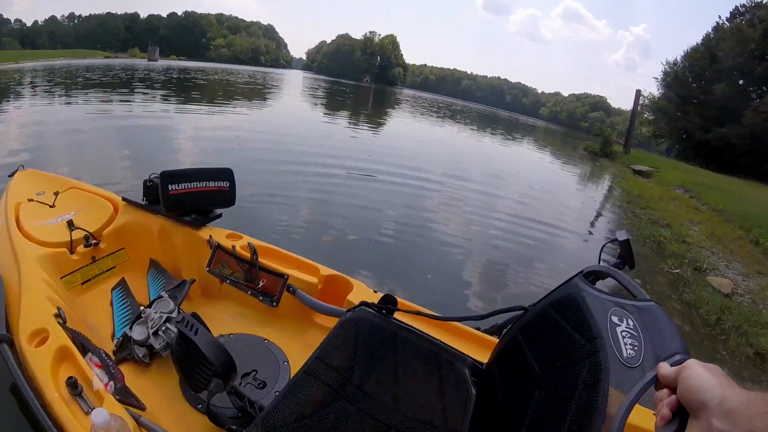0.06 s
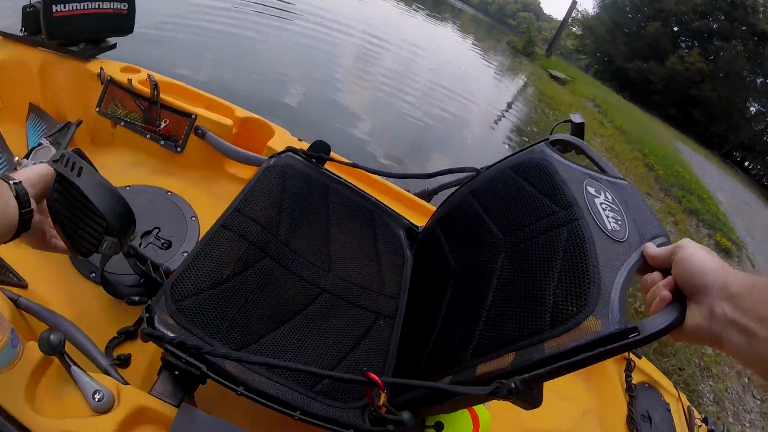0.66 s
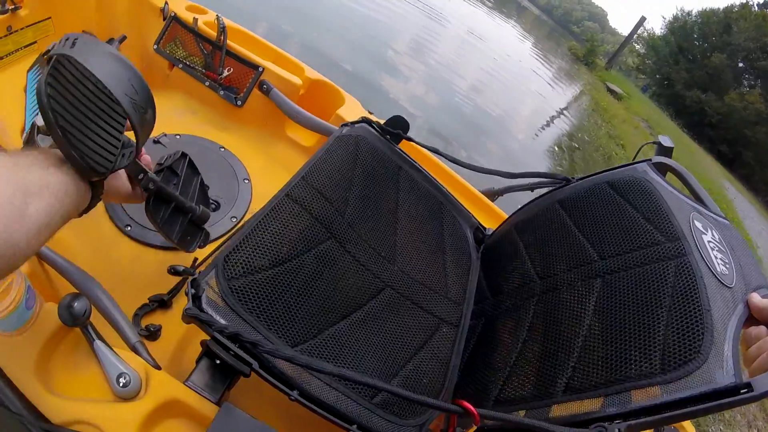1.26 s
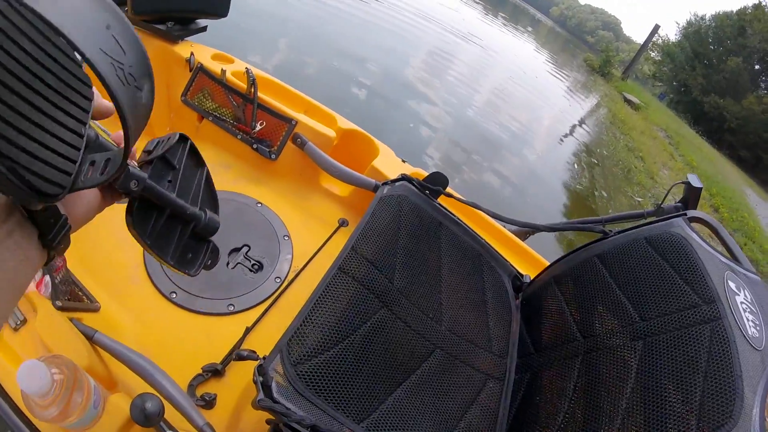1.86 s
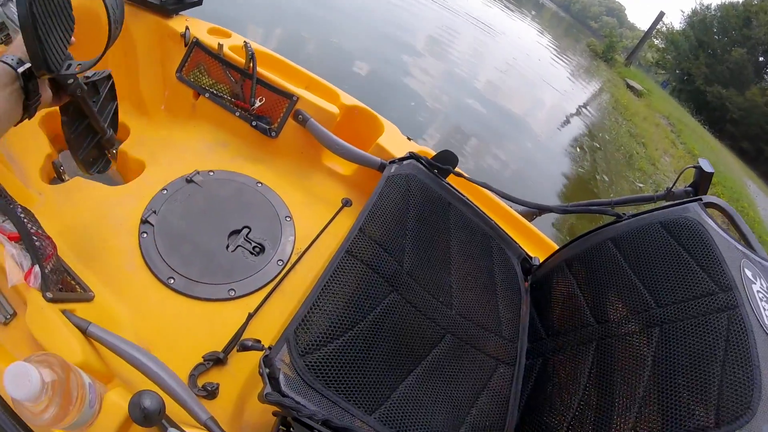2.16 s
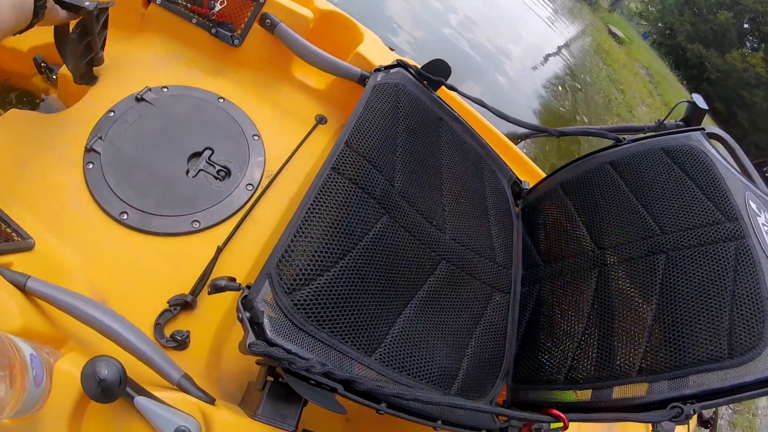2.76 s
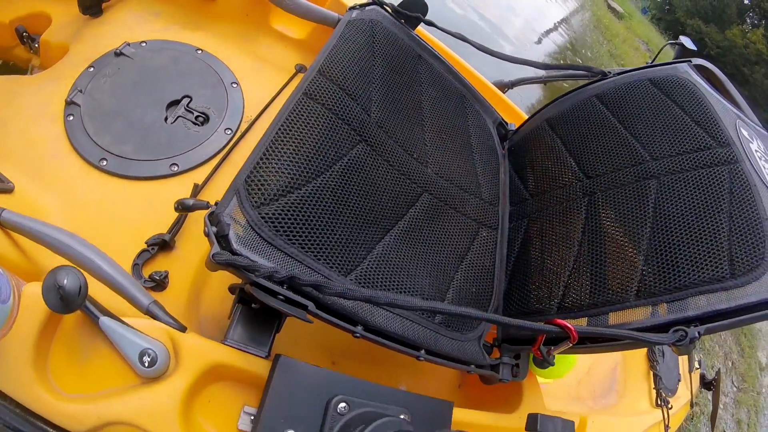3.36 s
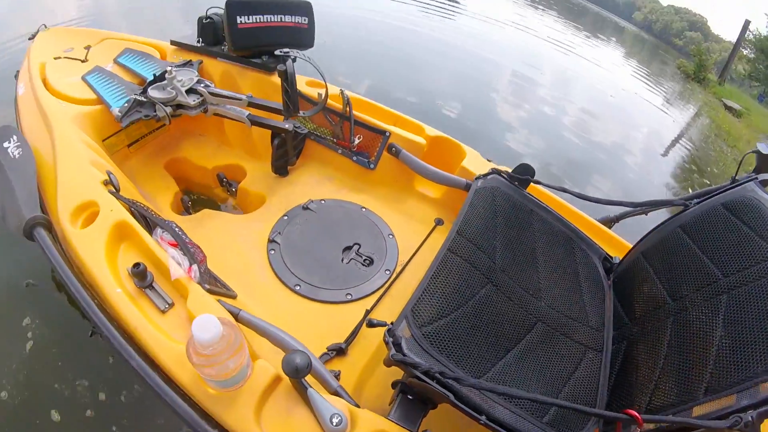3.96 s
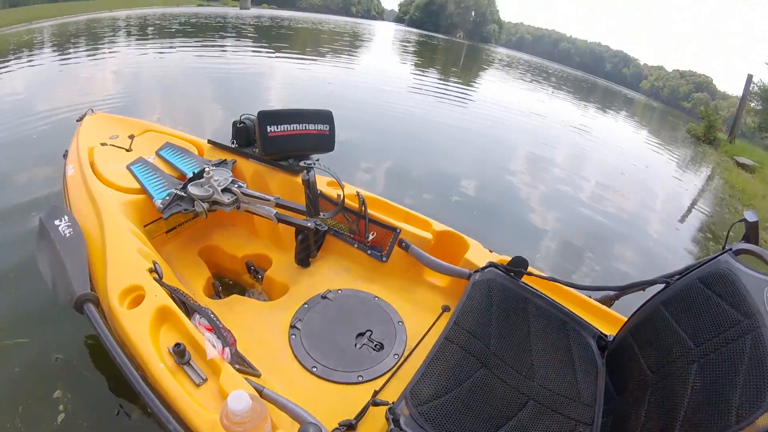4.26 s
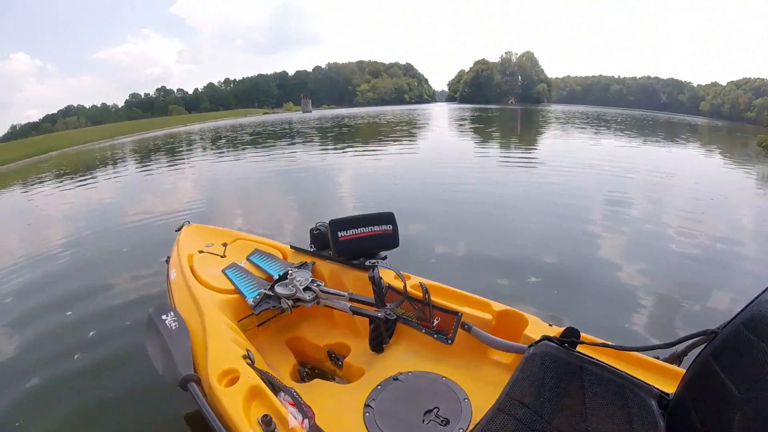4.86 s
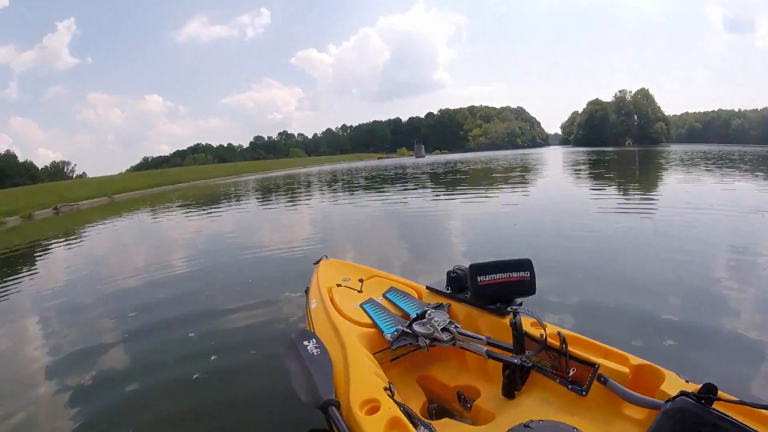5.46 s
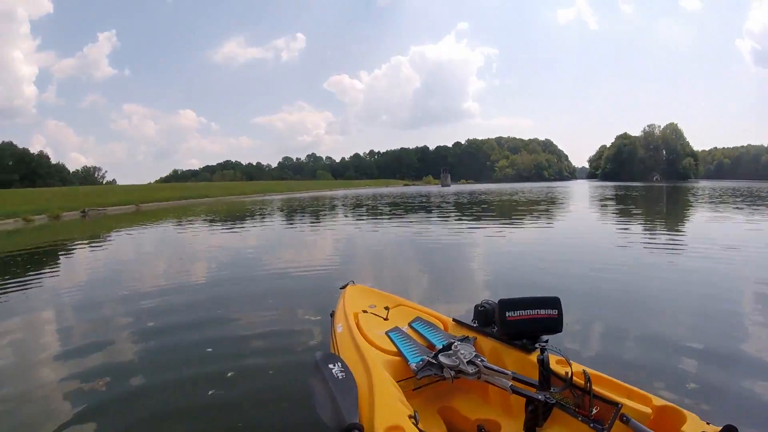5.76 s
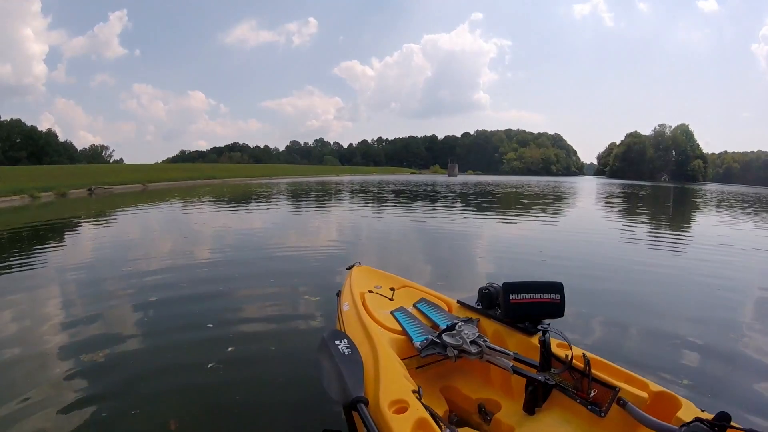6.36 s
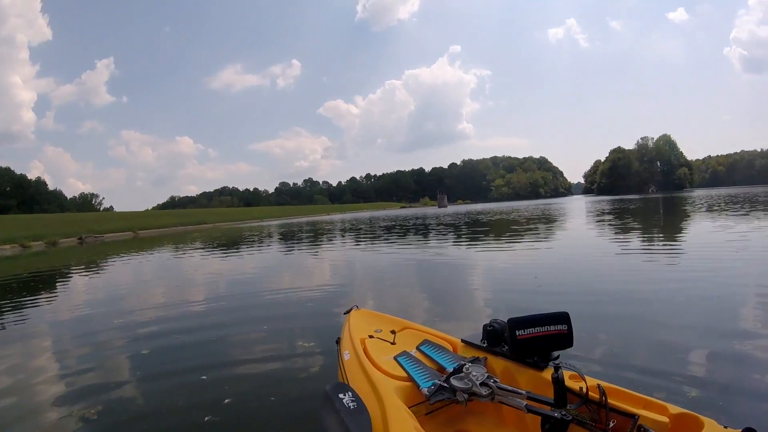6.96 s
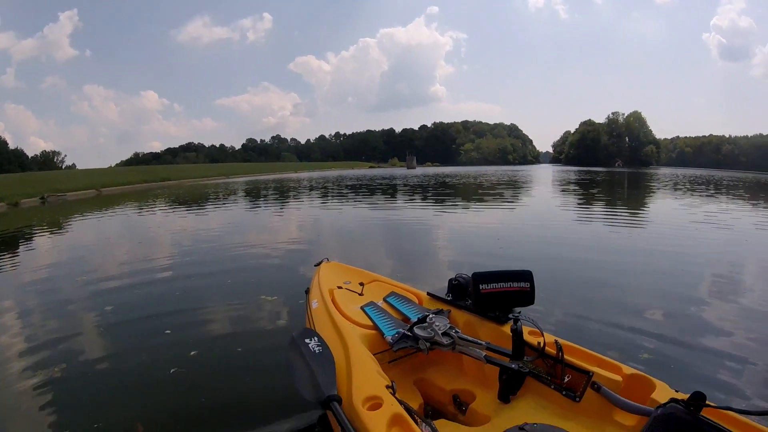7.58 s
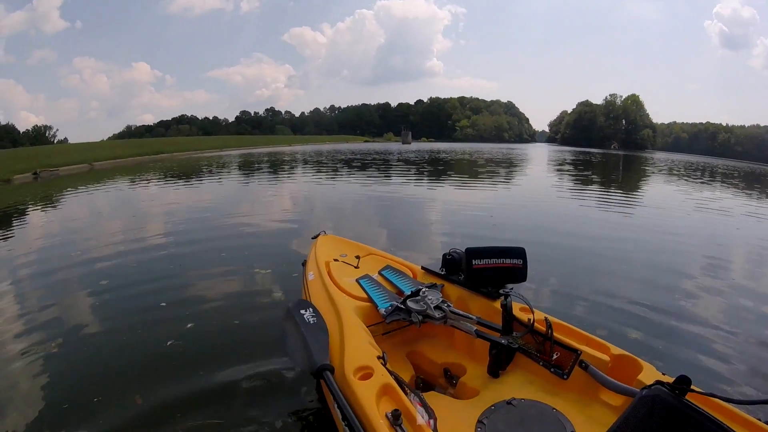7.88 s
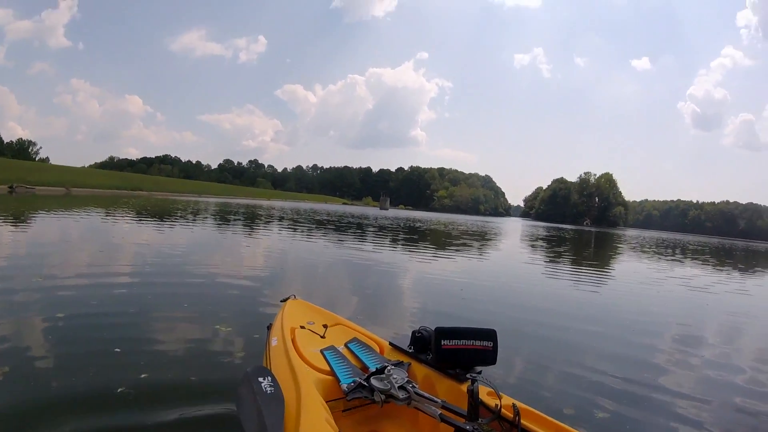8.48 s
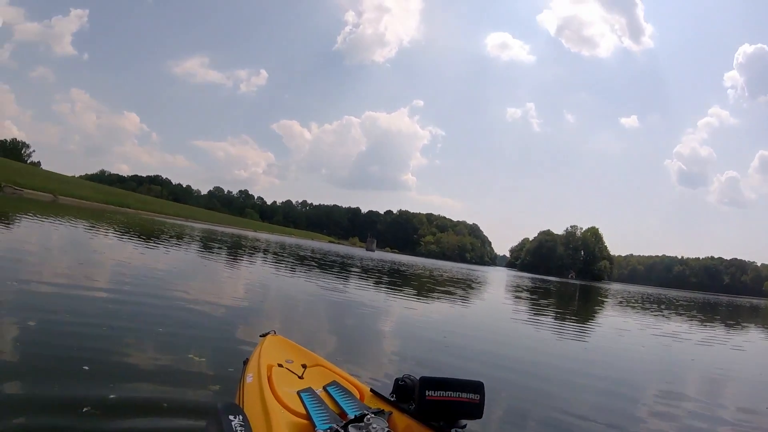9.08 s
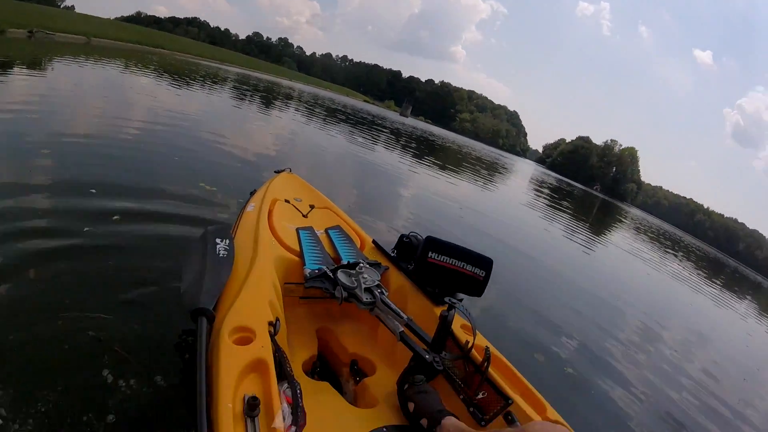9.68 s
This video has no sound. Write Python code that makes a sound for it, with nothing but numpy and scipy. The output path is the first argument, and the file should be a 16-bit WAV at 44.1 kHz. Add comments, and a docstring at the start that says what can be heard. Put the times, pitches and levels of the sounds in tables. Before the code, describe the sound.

Close and dry at a quiet lakeside, a light wind buffets the microphone while ripples lap under a plastic kayak. Gear bumps the hollow hull several times, its fittings clicking and rubbing. Then the knocks grow softer as the boat moves out: water swishes and bubbles along its sides, drops plink, and one firmer thump comes near the end.

```python
"""A light breeze rumbles on the microphone and ripples lap under a hollow plastic kayak at a calm lake edge.
Its pedal drive is lifted and dropped into its well: the walls ring, the hull booms, fittings click and rub.
Then the boat moves out: water swishes and gurgles along it, wavelets slap the hull and drops plink as
their bubbles ring. An automatic gain control ducks the whole mix after the loudest blows."""
import sys
import numpy as np
from scipy import signal
from scipy.fft import rfft, irfft, next_fast_len
from scipy.io import wavfile
from scipy.ndimage import uniform_filter1d

SR = 44100
rng = np.random.default_rng(int(sys.argv[2]) if len(sys.argv) > 2 else 0)


def to_wav(sig):
    """Store sig (one row per channel, or 1-D mono) as 16-bit WAV at the path in sys.argv[1].

    Samples outside -1..1 are clipped; the rate is SR.
    """
    pcm = np.clip(np.atleast_2d(sig), -1, 1) * 32767
    pcm = np.round(pcm).astype(np.int16)
    wavfile.write(sys.argv[1], SR, pcm.T)  # frames by channels


N = 429093
TIME = np.arange(N) / SR
AGE = np.arange(SR) / SR  # the clock of a one-shot, one second long


def from_db(db):
    """Decibels to gain."""
    return 10 ** (np.asarray(db) / 20)


def rms_one(x):
    """Scale to rms 1."""
    return x / np.sqrt(np.mean(x ** 2) + 1e-20)


def peak_one(x, size):
    """Scale so that the loudest stretch of size samples has rms 1."""
    return x / np.sqrt(uniform_filter1d(x ** 2, size, mode="constant").max() + 1e-20)


def add(out, s, sound):
    """Mix a sound in at time s."""
    start = max(round(s * SR), 0)
    out[start:start + len(sound)] += sound[:N - start]


def fade(t60):
    """A one-second envelope that falls 60 dB every t60 seconds."""
    return np.exp(-np.log(1000) * AGE / max(t60, 1e-3))


def drift(rate):
    """Slow random wander of rms 1, with rate turning points a second."""
    knots = rng.standard_normal(int(N / SR * rate) + 2)
    return rms_one(np.interp(TIME * rate, np.arange(len(knots)), knots))


def colour(x, spectrum):
    """Minimum-phase EQ along the given curve, falling 12 dB per octave beyond its ends."""
    size = 2 * next_fast_len(len(x) // 2 + 2048)
    hz, db = np.transpose(spectrum)
    bins = np.maximum(np.arange(size // 2 + 1) * SR / size, 1)
    octaves_outside = np.abs(np.log2(bins / np.clip(bins, hz[0], hz[-1])))
    curve = np.interp(np.log(bins), np.log(hz), db) - 12 * octaves_outside
    cepstrum = irfft(np.log(from_db(curve)))
    cepstrum[1:size // 2] *= 2  # folded forward, so nothing rings ahead of an attack
    cepstrum[size // 2 + 1:] = 0
    return irfft(rfft(x, size) * np.exp(rfft(cepstrum)))[:len(x)]


def resonate(x, hz, width_hz):
    """One resonance, gain 1 at its peak."""
    r = np.exp(-np.pi * width_hz / SR)
    poles = [1, -2 * r * np.cos(2 * np.pi * hz / SR), r * r]
    return signal.lfilter(np.array([1, 0, -1]) * (1 - r * r) / 2, poles, x + 1e-18)


def grains(per_s, spread_db, size):
    """Tiny impulses of uneven height at random moments."""
    heights = from_db(spread_db * np.minimum(rng.exponential(1, size), 4))
    return (rng.random(size) < per_s / SR) * heights * rng.choice([-1, 1], size)


# Fader ride of the breeze: (time [s], level [dB])
BREEZE_RIDE = [(0.0, -51), (1.19, -45.5), (1.68, -42), (1.87, -46), (2.14, -55.5), (2.52, -42),
               (3.11, -44.5), (3.6, -52.5), (4.25, -44), (4.42, -52.5), (5.2, -49.5), (5.39, -51.5),
               (6.29, -52.5), (7.37, -45.5), (7.97, -47.5), (8.26, -45.5), (8.48, -52), (9.73, -42.5)]
# EQ of the wind rumble: (frequency [Hz], level [dB])
BREEZE_EQ = [(15, -7), (30, -3.5), (58, -3), (90, -15.5), (150, -17), (300, -34.5)]
# EQ of the still lakeside bed: (frequency [Hz], level [dB])
LAKESIDE_EQ = [(25, -11), (60, -14.5), (220, -17), (430, -19.5), (600, -28.5), (1100, -32.5), (2200, -36),
               (3500, -37), (4500, -48), (5600, -45.5), (7200, -37), (9200, -41), (10300, -47.5),
               (12500, -46.5)]


def air():
    """A lumpy breeze buffets the microphone over the still lakeside and a thin high hiss."""
    gusts = from_db(3.5 * np.tanh(drift(rate=9)))
    breeze = rms_one(colour(rng.standard_normal(N), BREEZE_EQ) * gusts)
    breeze_db = np.interp(TIME, *np.transpose(BREEZE_RIDE))
    lakeside = rms_one(colour(rng.standard_normal(N), LAKESIDE_EQ))
    hiss = rms_one(resonate(rng.standard_normal(N), hz=6520, width_hz=160))
    return from_db(breeze_db) * breeze + from_db(-59) * lakeside + from_db(-73) * hiss


def bubble(hz, t60, glide):
    """Trapped air rings as a dying sine, gliding in octaves per second, and soon bursts."""
    age = AGE[:int(max(t60, 1e-3) * SR)]
    phase = 2 * np.pi * np.cumsum(hz * 2 ** (glide * age)) / SR
    attack = 1 - np.exp(-age * hz)
    alive = np.exp(-(age / .045) ** 4)
    return np.sin(phase) * np.exp(-np.log(1000) * age / t60) * attack * alive


def bubble_cloud(count, low_hz, high_hz, cycles, spread_db, small_db):
    """Bubbles of many sizes, born at random moments, the smallest trimmed by small_db; rms 1."""
    out = np.zeros(N)
    for when, pitch, strength, life in rng.random((count, 4)):
        hz = low_hz * (high_hz / low_hz) ** pitch
        ring = bubble(hz, t60=cycles * (.5 + life) / hz, glide=10 * life)
        add(out, when * TIME[-1], from_db(spread_db * strength ** 2 + small_db * pitch) * ring)
    return rms_one(out)


def swell(crest_s, rise_s):
    """Water builds smoothly to a crest and ebbs slightly faster."""
    from_crest = (TIME - crest_s) / np.where(TIME < crest_s, rise_s, .94 * rise_s)
    return 1 / np.cosh(np.clip(np.pi / 2 * from_crest, -20, 20))


# Swells of lapping as the boat rocks: (crest time [s], level [dB])
ROCKINGS = [(0.05, -56), (0.45, -57), (1.3, -54.5), (4.1, -55), (5.2, -54), (5.98, -49), (6.78, -62),
            (7.68, -52.5), (8.7, -53.5), (9.2, -61), (9.68, -55)]


def lapping():
    """Ripples lap beneath the rocking hull in swells of low, short-lived bubbles."""
    rocking = sum(from_db(db) * swell(s, rise_s=.2) for s, db in ROCKINGS)
    laps = bubble_cloud(count=2600, low_hz=270, high_hz=950, cycles=9, spread_db=9, small_db=-6)
    return rocking * laps


def struck(modes, db_per_octave, scatter_db, travel_s, detune):
    """Each hit lands elsewhere: every mode gets its own strength, travel time and slight detuning."""
    out = np.zeros(SR)
    for hz, db, t60 in modes:
        age = np.maximum(AGE - travel_s * rng.random(), 0)
        tilt_db = db_per_octave * np.log2(hz / modes[0][0])
        gain = from_db(db + tilt_db + scatter_db * rng.standard_normal())
        detuned_hz = hz * (1 + detune * rng.standard_normal())
        out += gain * np.sin(2 * np.pi * detuned_hz * age) * fade(t60)
    return out


# Body of a hit, the plastic walls: (frequency [Hz], level [dB], decay t60 [s])
WALL_MODES = [(148, -12, 0.51), (174.6, -4.5, 0.24), (208.9, -6.5, 0.28), (231, -6, 0.23),
              (265.5, -1.5, 0.11), (308, -6, 0.16), (369.8, -6.5, 0.15), (429, 0.5, 0.055),
              (463.3, -9, 0.15), (532, -1.5, 0.056), (621, -14, 0.11), (673, -5.5, 0.019),
              (827, -12, 0.055)]
# Low end, the whole hull and the air in it: (frequency [Hz], level [dB], decay t60 [s])
BOOM_MODES = [(57.8, -0.5, 0.15), (77, -10.5, 0.62), (86.7, 8.5, 0.13), (114, -0.5, 0.35)]
# EQ of the contact transient: (frequency [Hz], level [dB])
CRACK_EQ = [(500, 6), (900, 2.5), (1400, 1.5), (2300, 1.5), (3300, -4.5), (4000, -8), (5000, -22),
            (6200, -16.5), (8000, -27), (12000, -38)]


def blow(wall_db, boom_db, crack_db, brightness, panel_hz):
    """A blow cracks at the contact, rings the walls and booms in the hollow."""
    db_per_octave = min(.73 * brightness, 7)
    wall = struck(WALL_MODES, db_per_octave, scatter_db=3, travel_s=.00291, detune=.028)
    panel = resonate(wall, panel_hz, width_hz=46)  # the struck panel favours modes near its own pitch
    wall = peak_one(wall + panel, size=441)
    boom = struck(BOOM_MODES, db_per_octave=0, scatter_db=2, travel_s=.008, detune=.03)
    boom = peak_one(boom, size=882)
    loose_gear = rms_one(grains(per_s=450, spread_db=3.5, size=SR))  # rattles on after the contact
    contact = rng.standard_normal(SR) * fade(.06) + from_db(-22) * loose_gear * fade(.48)
    attack = 1 - np.exp(-AGE / .00043)  # soft plastic takes a moment to give way
    crack = peak_one(colour(contact * attack, CRACK_EQ), size=220)
    return from_db(wall_db - 9) * wall + from_db(boom_db - 11.5) * boom + from_db(crack_db - 7) * crack


# Hits on the hull from gear and wavelets, levels ahead of each layer's trim:
# (time [s], wall [dB], boom [dB], crack [dB], wall brightness [relative], panel pitch [Hz])
HULL_HITS = [(0.108, -17, -60, -31, 3, 430), (0.417, -27, -28.5, -42, -1.5, 193),
             (0.867, -28.5, -42, -48, 1.5, 450), (0.907, -35.5, -56, -52, 0, 422),
             (1.123, -26.5, -40, -40.5, -3, 426), (1.236, -26.5, -25.5, -30.5, -6.5, 218),
             (1.476, -16.5, -20, -34, -3.5, 260), (1.584, -20, -11.5, -23.5, -7, 170),
             (2.152, -36.5, -53, -69, -1, 404), (2.439, -10.5, -12, -22.5, -1.5, 221),
             (2.536, -15.5, -17, -35, -7, 218), (2.784, -20, -42, -35, -7.5, 343),
             (2.852, -22, -51, -37.5, 4.5, 166), (3.007, -6, -11.5, -20.5, -0.5, 343),
             (3.094, -14.5, -16, -27.5, 2.5, 420), (3.623, -30, -38, -46.5, -6, 294),
             (3.995, -31, -37, -51, -3, 450), (4.252, -13.5, -16.5, -31.5, 2, 396),
             (4.392, -37.5, -57, -46.5, 3, 400), (4.63, -37.5, -36, -47, 6, 430),
             (4.67, -28, -41.5, -55, 0, 235), (5.157, -29.5, -47, -45, 6, 438),
             (5.22, -29.5, -58, -47.5, 6, 420), (5.293, -31.5, -64, -67, -2, 310),
             (5.402, -36, -55.5, -83, -4, 191.4), (5.496, -29.5, -59, -87, 0, 152),
             (5.562, -30.5, -32.5, -47.5, 4, 389), (6.562, -24.5, -56, -38.5, 4, 540),
             (6.692, -24, -47, -43.5, 4.5, 415), (7.118, -24.5, -40, -58, -3.5, 406),
             (7.212, -27.5, -28, -44, 2, 494), (7.429, -38, -33, -71, -3, 240),
             (7.754, -31.5, -57, -45.5, 10.5, 430), (8.058, -27, -57, -70, -3.5, 400),
             (8.161, -25.5, -23.5, -40, 2, 414), (8.593, -27.5, -49, -48, 11, 513),
             (8.968, -33, -55, -46.5, 13, 460), (9.473, -16.5, -16.5, -49, 0.5, 425),
             (9.631, -29.5, -40, -38, 8.5, 169)]
HEAVY_DB, BOUNCE_S, BOUNCE_DB = -12, .0135, -6.5


def hull():
    """Every blow sounds the hull; a heavy one bounces once, weaker and brighter."""
    out = np.zeros(N)
    for s, wall_db, boom_db, crack_db, brightness, panel_hz in HULL_HITS:
        add(out, s, blow(wall_db, boom_db, crack_db, brightness, panel_hz))
        if wall_db > HEAVY_DB:
            bounce = blow(wall_db, boom_db, crack_db, brightness + 8, panel_hz)
            add(out, s + BOUNCE_S, from_db(BOUNCE_DB) * bounce)
    return out


# EQ of a click's dry snap: (frequency [Hz], level [dB])
SNAP_EQ = [(600, 1), (1400, -2.5), (2400, -4), (3700, -3), (5000, -18), (8000, -40)]
# Ring of the pedal drive and its fittings: (frequency [Hz], level [dB], decay t60 [s])
GEAR_MODES = [(1400, -4.5, 0.029), (1607, -8.5, 0.032), (1810, -19, 0.048), (1980, -11.5, .035),
              (2190, -1, 0.024), (2310, -4.5, 0.023), (2410, -9.5, 0.029), (2660, -2, 0.018),
              (2810, -2.5, 0.017), (3430, -7, 0.021)]
# EQ of the bright tick on top: (frequency [Hz], level [dB])
TICK_EQ = [(3500, -16), (5000, -1.5), (6200, 11.5), (7500, -4), (9200, -3), (10500, -17), (12500, -22)]


def click(db, hz):
    """A dry snap, coloured by the part that was touched, with a brief ring of gear and a bright tick."""
    snap = colour(rng.standard_normal(SR) * (fade(.027) + from_db(-17.5) * fade(.036)), SNAP_EQ)
    snap = peak_one(snap + from_db(19.5) * resonate(snap, hz, width_hz=550), size=132)
    ring = struck(GEAR_MODES, db_per_octave=-1.5, scatter_db=-1, travel_s=.00099, detune=.0029)
    ring = peak_one(ring, size=132)
    tick = colour(rng.standard_normal(SR) * (fade(.0078) + from_db(-5.5) * fade(.046)), TICK_EQ)
    tick = peak_one(tick, size=132)
    tick_db = .56 * db - 33.5  # follows the level only partly, so soft clicks are brighter
    return from_db(db - 11) * snap + from_db(db - 14) * ring + from_db(tick_db) * tick


# Spot clicks of the gear: (time [s], relative level [dB], ring pitch [Hz])
FITTING_CLICKS = [(0.41, -38.5, 2120), (1.0966, -38, 2170), (1.139, -37.5, 2400), (1.3625, -44.5, 2160),
                  (1.516, -30.5, 2120), (1.5912, -14, 2160), (1.6069, -11.5, 2420), (2.4412, -20, 2070),
                  (2.8663, -40.5, 3300), (4.065, -32.5, 2900), (4.0825, -33.5, 2930), (4.1067, -40, 3440),
                  (4.18, -42, 3100), (4.2531, -18.5, 2660), (4.872, -38, 2920), (4.9094, -40, 3580),
                  (4.9816, -34, 2010), (5.092, -47.5, 2850), (5.1823, -36.5, 3600), (5.674, -43, 2100),
                  (6.3735, -42, 3560), (6.6782, -50, 2805), (7.714, -43, 2120), (8.1576, -30, 2760),
                  (8.212, -38.5, 1560), (8.8997, -44.5, 3000), (9.2878, -40.5, 1490), (9.3199, -41.5, 1580)]


def fittings():
    """Hard little fittings snap against each other."""
    out = np.zeros(N)
    for s, db, hz in FITTING_CLICKS:
        add(out, s, click(db, hz))
    return out


# Solo bubbles: (time [s], level [dB], pitch [Hz], glide [octaves/s])
PLINKS = [(0.680, -41.5, 467, -1.5), (0.772, -50, 1380, 4), (1.866, -44.5, 687, 5), (5.644, -45, 1910, 3),
          (5.773, -38.5, 1350, 9), (5.909, -36, 950, 11.5), (6.052, -40, 976, 11), (6.219, -32.5, 716, 11),
          (6.478, -36, 2030, 16), (8.675, -40.5, 2160, -8), (8.712, -42.5, 665, 7), (8.806, -35.5, 790, 12),
          (8.866, -40, 2350, -9), (9.011, -47.5, 2110, -7)]


def plinks():
    """Drops and the biggest bubbles stand out as single notes; the lower, the longer they ring."""
    out = np.zeros(N)
    for s, db, hz, glide in PLINKS:
        add(out, s, from_db(db) * bubble(hz, t60=66 / hz, glide=glide))
    return out


# Gear sliding on plastic: (time [s], length [s], level [dB], squeal pitch [Hz], squeal send [dB])
RUBS = [(1.06, 0.56, -63, 2950, -8), (1.655, 0.14, -54.5, 2200, 18), (2.449, 0.18, -54.5, 2320, 4),
        (2.81, 0.079, -53.5, 2840, 5), (3.02, 0.095, -52.5, 2300, -7), (3.579, 0.065, -59.5, 3600, -2),
        (4.048, 0.23, -63, 3330, -10), (7.702, 0.063, -49, 3170, -14), (9.481, 0.039, -52.5, 2960, -7)]
# EQ of the scrape: (frequency [Hz], level [dB])
SCRAPE_EQ = [(600, 1.5), (1400, -4), (2400, -8.5), (3700, -3), (5000, -19), (6200, -12.5), (9000, -20.5),
             (12000, -32)]


def rubbing():
    """Plastic sticks and slips in a quick uneven chatter that swells and dies."""
    out = np.zeros(N)
    for s, length, db, hz, squeal_db in RUBS:
        size = int(length * SR)
        slips = colour(grains(per_s=1200, spread_db=3, size=size), SCRAPE_EQ)
        squeal = resonate(resonate(slips, hz, width_hz=420), hz, width_hz=420)
        rub = rms_one(slips + from_db(squeal_db) * squeal)
        add(out, s, from_db(db) * rub * signal.windows.tukey(size, .5))
    return out


# Moments when the boat is disturbed: (start [s], end [s])
JIGGLES = [(1.15, 1.33), (4.12, 4.23), (4.775, 4.825), (6.62, 6.8)]
JIGGLES_PER_S = 15


def jiggling():
    """Loose fittings click faintly at uneven intervals, each at its own pitch."""
    out = np.zeros(N)
    for start, end in JIGGLES:
        count = max(round((end - start) * JIGGLES_PER_S), 1)
        for k, (when, strength, part) in enumerate(rng.random((count, 3))):
            sound = click(db=-48 + 10 * strength, hz=2600 * 2 ** (part - .5))
            add(out, start + (k + when) / count * (end - start), sound)
    return out


# Swishes along the hull, levels ahead of each layer's trim:
# (crest time [s], swell time [s], flow [dB], splash [dB])
SURGES = [(5.7, 0.037, -51.5, -80), (6.1, 0.42, -47, -68), (6.18, 0.097, -65, -63.5),
          (6.44, 0.096, -55.5, -64), (6.76, 0.18, -59.5, -70.5), (7.65, 0.11, -62, -73),
          (8.1, 0.21, -54, -65), (8.442, 0.059, -51, -63.5), (8.63, 0.057, -54, -63.5)]
# EQ of the rushing water: (frequency [Hz], level [dB])
RUSH_EQ = [(400, 1), (800, -18), (1500, -2.5), (2400, -10.5), (3500, -11), (5000, -25.5)]
# EQ of the fizzing spray: (frequency [Hz], level [dB])
SPRAY_EQ = [(600, -4), (1200, -1), (2400, -5.5), (3600, 0), (4200, -7.5), (5000, -16), (6500, -1.5),
            (7500, -9.5), (9000, -11), (12500, -29)]
UNDER_WAY_S, WAKE_RISE_S = 7.5, .45  # from here a faint wake fades in and trickles on


def swishing():
    """Water along the hull rushes and fizzes; stirred harder, it traps air and gurgles."""
    wake = np.clip((TIME - UNDER_WAY_S) / WAKE_RISE_S, 0, 1)
    flow_gain, splash_gain = from_db(-65) * wake, from_db(-76.5) * wake
    for s, rise_s, flow_db, splash_db in SURGES:
        surge = swell(s, rise_s)
        flow_gain = np.hypot(flow_gain, from_db(flow_db) * surge)
        splash_gain = np.hypot(splash_gain, from_db(splash_db) * surge)
    rush = rms_one(colour(grains(per_s=2300, spread_db=-1.5, size=N), RUSH_EQ))
    gurgle = bubble_cloud(count=4200, low_hz=560, high_hz=2500, cycles=24, spread_db=16, small_db=-2)
    gulps = from_db(2 * drift(rate=22))  # air folds under unevenly
    trapped_air = np.sqrt(flow_gain / flow_gain.max()) * gulps
    droplets = bubble_cloud(count=2600, low_hz=1900, high_hz=7500, cycles=20, spread_db=17, small_db=-7)
    spray = rms_one(colour(grains(per_s=2100, spread_db=2.5, size=N), SPRAY_EQ))
    flow = from_db(-9) * rush + from_db(-1) * trapped_air * gurgle
    splash = from_db(6) * spray + from_db(.5) * droplets
    return flow_gain * flow + splash_gain * splash


DUCK_ABOVE_DB, DUCK_MOST_DB, DUCK_ATTACK_S, RELEASE_DB_PER_S = -21.5, 4.5, .032, 2


def gain_control(x):
    """Loud blows pull the gain down quickly; it creeps back at a steady pace."""
    level_db = 10 * np.log10(np.maximum(uniform_filter1d(x ** 2, size=1764), 1e-12))
    over_db = np.clip(level_db - DUCK_ABOVE_DB, 0, DUCK_MOST_DB)
    release_db = RELEASE_DB_PER_S * TIME
    duck_db = np.maximum.accumulate(over_db + release_db, axis=-1) - release_db
    lag = np.exp(-1 / (DUCK_ATTACK_S * SR))
    return x * from_db(-signal.lfilter([1 - lag], [1, -lag], duck_db))


def scene():
    """A close, dry mono mix in open air."""
    return (air() + lapping() + hull() + fittings() + plinks() + rubbing() + jiggling() + swishing())[None]


def record(dry):
    """Master chain: the gain rides the loudest blows, then a steep low-pass takes off the top."""
    low_pass = signal.cheby2(14, 60, 14800, fs=SR, output="sos")
    return signal.sosfilt(low_pass, gain_control(dry))


dry = scene()
out = record(dry)
to_wav(out)
```